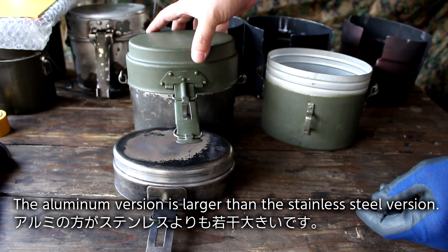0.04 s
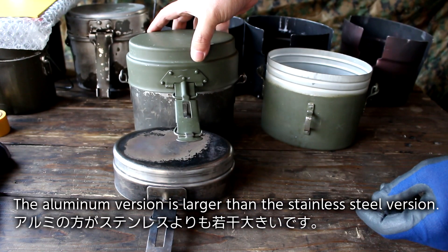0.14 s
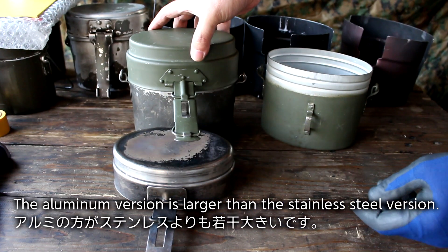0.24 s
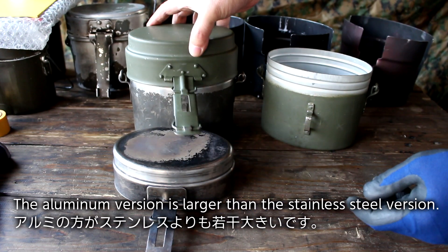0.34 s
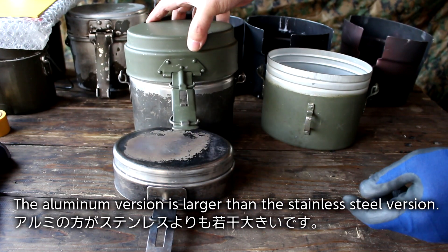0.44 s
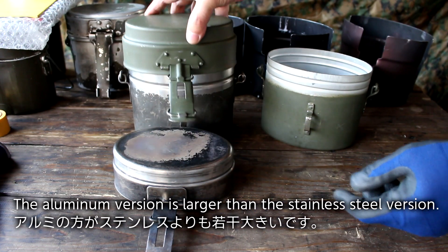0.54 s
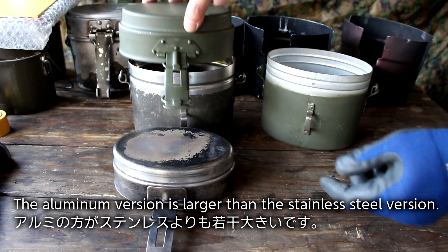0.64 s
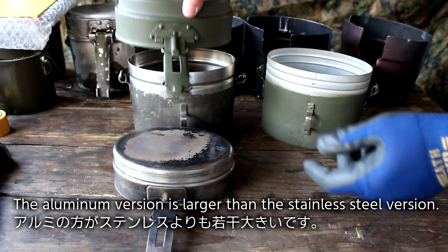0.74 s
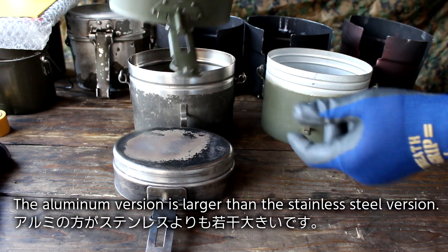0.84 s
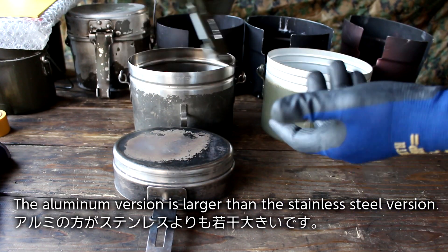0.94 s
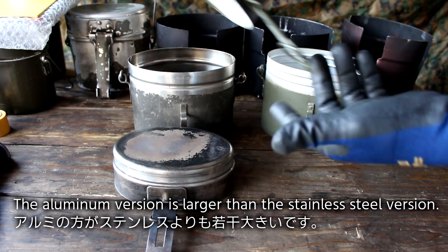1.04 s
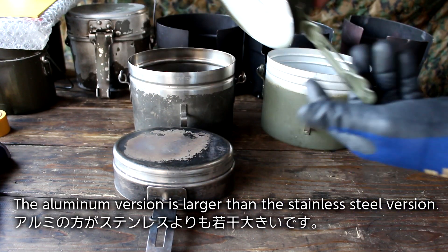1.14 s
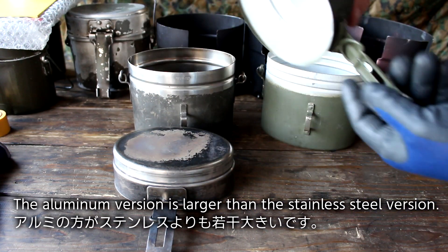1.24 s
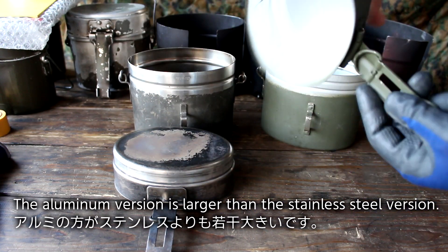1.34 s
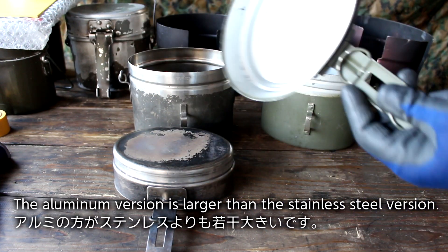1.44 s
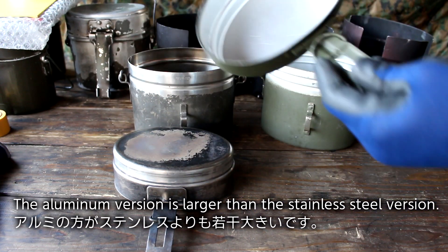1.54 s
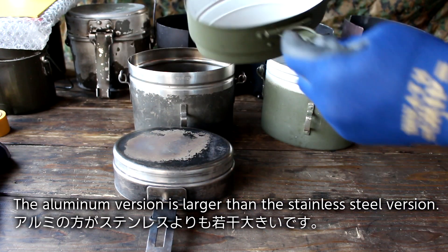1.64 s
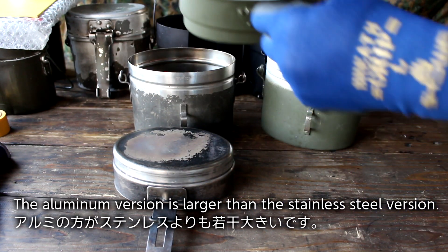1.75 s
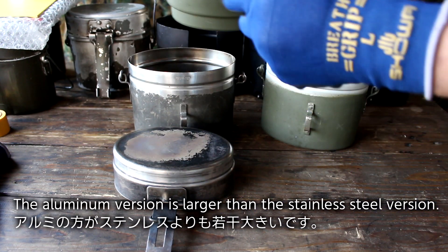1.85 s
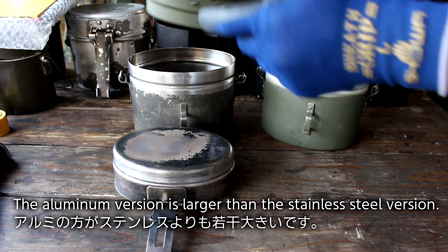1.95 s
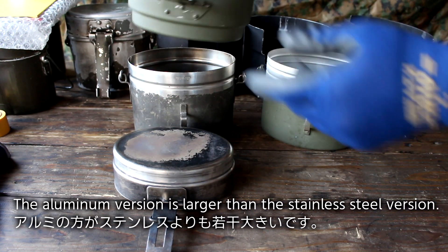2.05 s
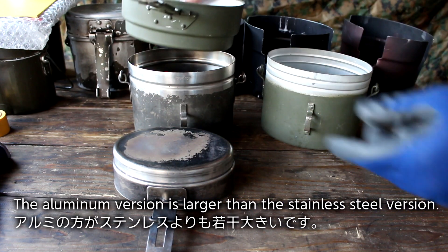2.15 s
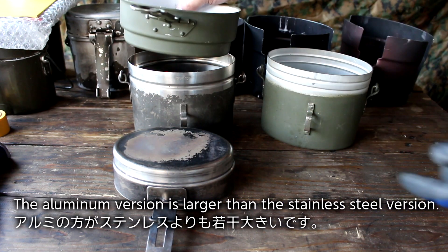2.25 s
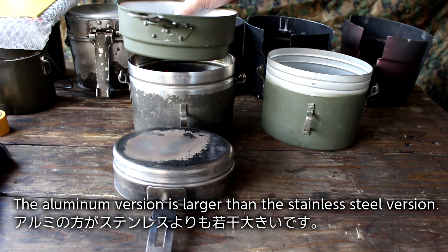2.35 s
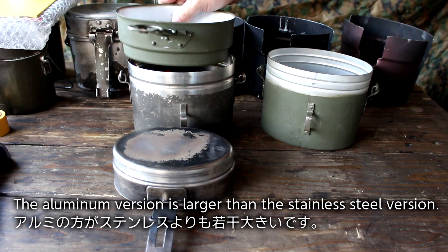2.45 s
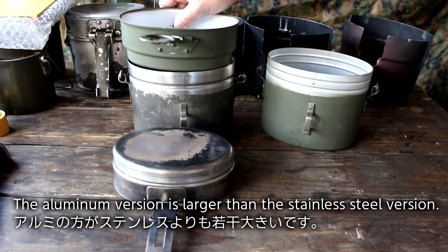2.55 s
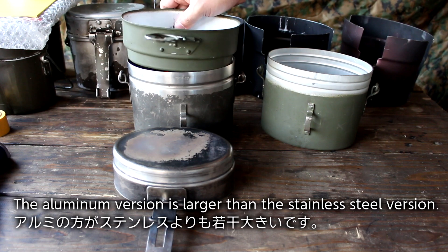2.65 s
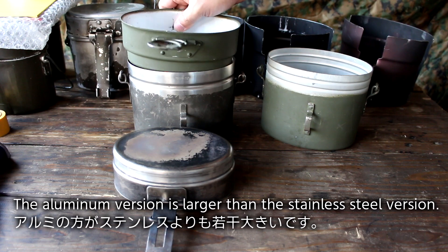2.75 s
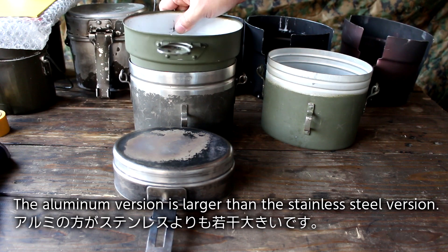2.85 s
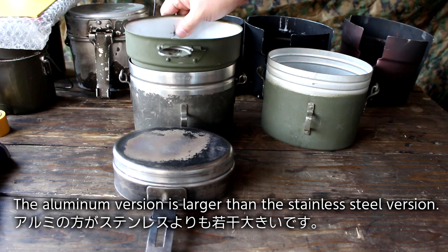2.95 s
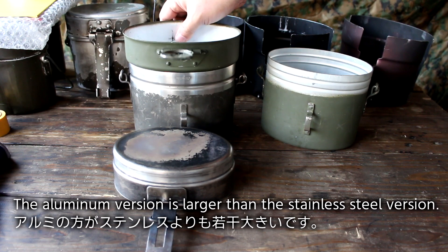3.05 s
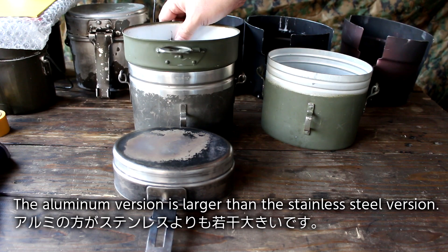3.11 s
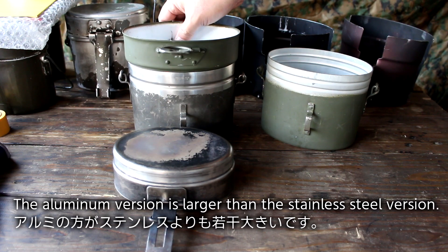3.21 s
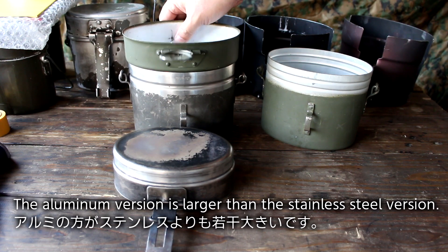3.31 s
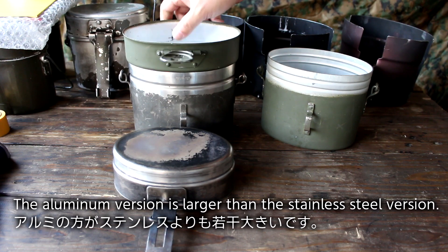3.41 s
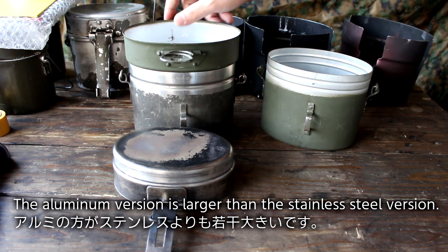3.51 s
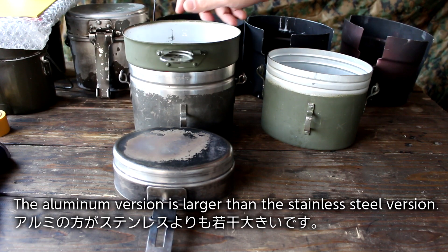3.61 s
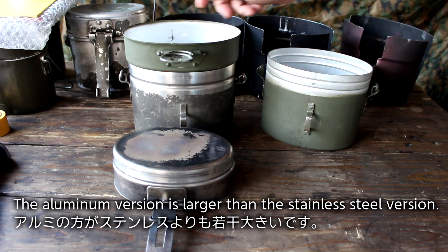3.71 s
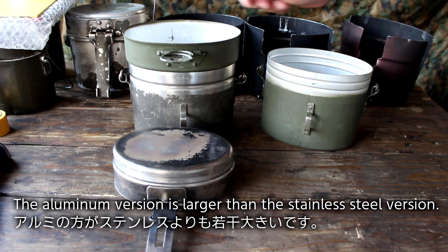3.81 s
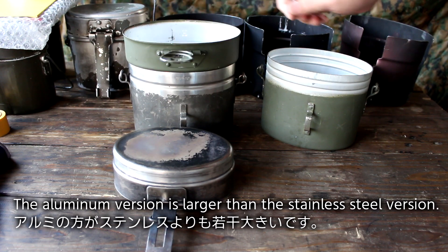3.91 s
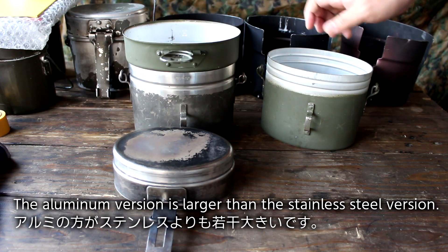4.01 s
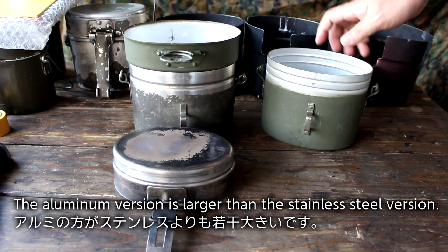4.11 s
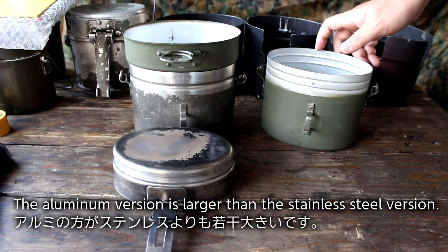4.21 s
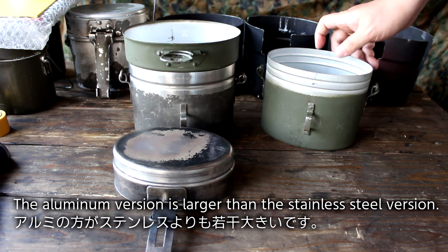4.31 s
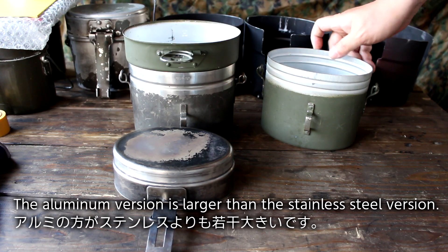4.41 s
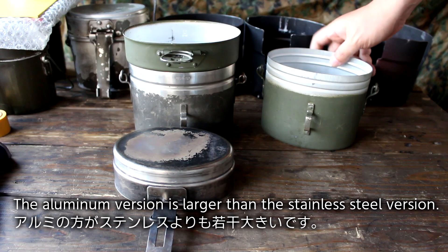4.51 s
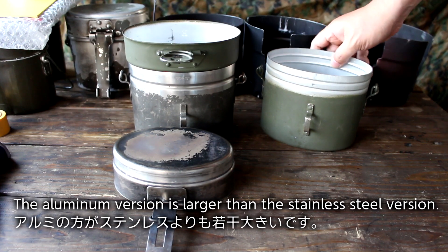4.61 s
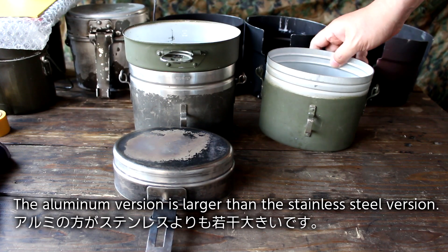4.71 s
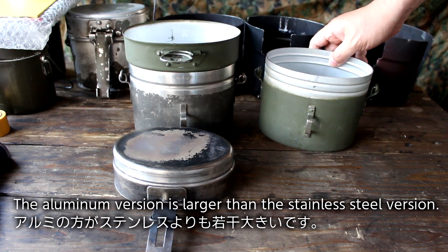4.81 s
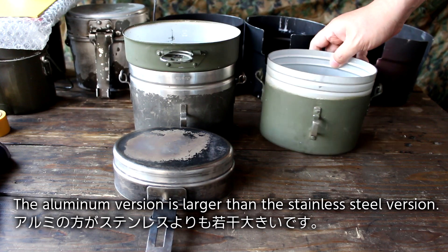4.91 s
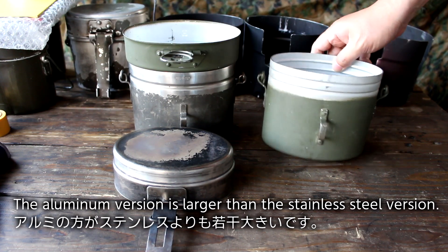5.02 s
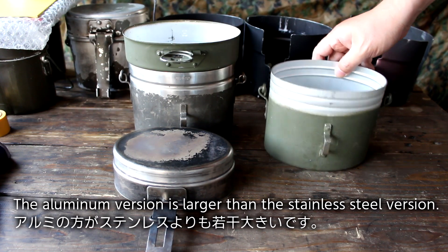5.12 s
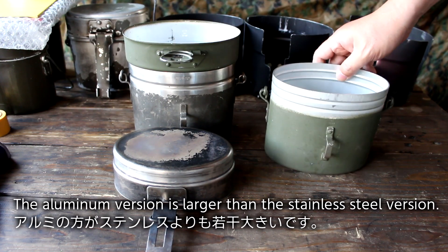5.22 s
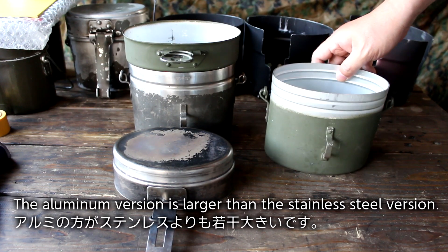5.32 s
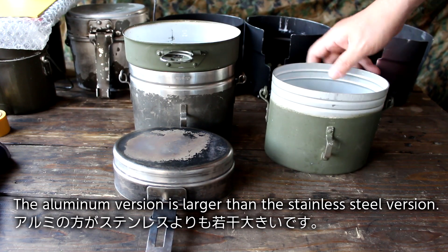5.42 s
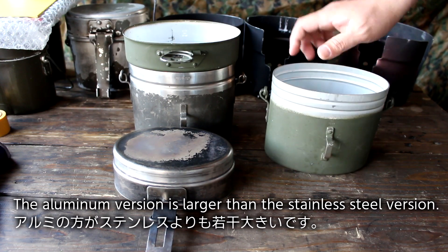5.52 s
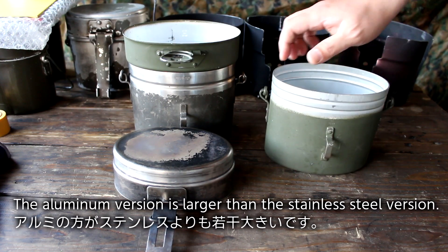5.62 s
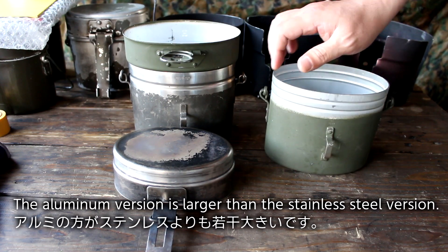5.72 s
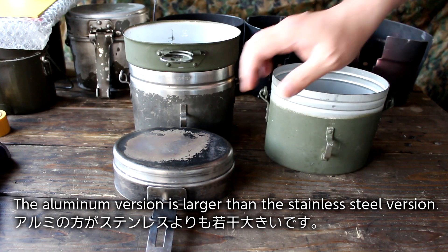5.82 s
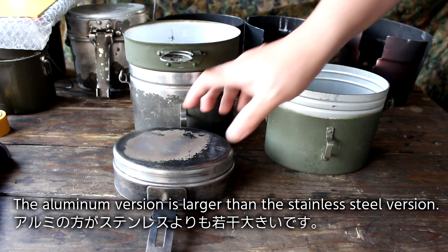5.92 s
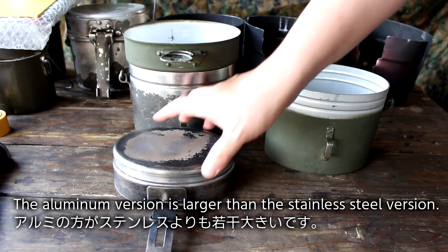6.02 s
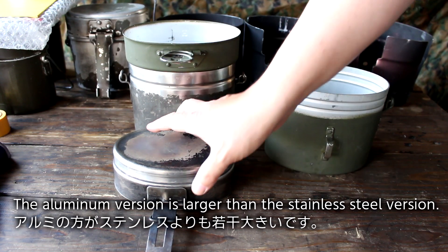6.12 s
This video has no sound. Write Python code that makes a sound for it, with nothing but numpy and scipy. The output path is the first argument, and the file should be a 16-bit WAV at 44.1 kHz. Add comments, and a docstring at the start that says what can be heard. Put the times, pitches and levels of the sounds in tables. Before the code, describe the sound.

In a quiet room, close and nearly mono, a tight lid rubs off a steel pot, which rings with a clank. The lid's folding handle clacks sharply, small wire tinkles follow, then light taps. The lid knocks and scrapes onto the rim with hollow, sinking notes. After a pause, an aluminium pot rattles its wire bail and thuds onto a wooden table.

```python
"""A quiet room: mess tins handled on a wooden table, close to a nearly mono microphone.
First a tight lid is rubbed off a steel pot, whose struck modes ring on; its folding handle clacks.
The lid is turned over, tapped by the handle, and shuffled onto the rim, pumping hollow notes from the gap.
Last an aluminium pot is lifted and set down with a thud while its wire bail rattles.
Knocks are decaying modes fed by chatter, strokes are filtered grains, and steady noise lies beneath."""
import sys
import numpy as np
from scipy import signal
from scipy.fft import rfft, irfft, next_fast_len
from scipy.io import wavfile
from scipy.ndimage import map_coordinates

SR = 44100
rng = np.random.default_rng(int(sys.argv[2]) if len(sys.argv) > 2 else 0)


def dump(signal):
    """Clip the signal to [-1, 1] and save it as 16-bit WAV at the path in sys.argv[1]."""
    limited = np.clip(np.atleast_2d(signal).T, -1, 1)
    pcm = np.round(limited * 32767).astype(np.int16)
    wavfile.write(sys.argv[1], SR, pcm)


N = 271656  # length in samples

# The room's steady hush: f/Hz, relative density/dB per Hz
AIR = [(12, -27), (20, -2), (86, -1), (138, -11.5), (187, -3.5), (228, -7.5), (319, -15.5), (357, -8),
       (422, -11), (499, -12), (759, -10.5), (1120, -6.5), (1610, -17), (14700, -23.5), (16000, -26)]
AIR_DB = -61.5
# Stereo width of the hush: f/Hz, side over mid level/dB
WIDTH = [(60, -15), (150, -16.5), (380, -9.5), (950, -20), (2380, -6.5), (5980, -3), (15000, 0)]
# Reverberation of the room: f/Hz, t60/s
ROOM = [(200, 0.58), (1000, 0.3), (4000, 0.2), (12000, 0.028)]
# Treble ripple of the microphone: f/Hz, level/dB
MIC = [(8000, -2.5), (8900, 1.5), (9700, -5), (10500, 3), (11500, -6), (12500, 1), (14500, 1)]
TOP_HZ = 16100

# The pot hums while the lid hovers over its mouth: middle t/s, half-length/s, level/dB
HOVERS = [(2.262, 0.1, -68.5), (2.853, 0.29, -61)]
MOUTH_HZ = 209.6
# The lid pumps the air in the gap beneath it; the narrower the gap, the lower the note:
# t/s, starting f/Hz, level/dB, rise/s
PUFFS = [(2.636, 388.4, -33, 0.0014), (2.894, 366, -41.5, .005), (3.04, 303, -34, 0.028),
         (3.2, 214, -44, 0.0022), (3.436, 247, -43, 0.0036)]
PUFF_T60 = 0.25  # s
PUFF_SAG, SAG_S = 0.11, 0.048  # share of its pitch a note loses as the lid settles; time constant/s

# Fingers shift on a tin that is held: middle t/s, half-length/s, level/dB, tilt/dB per band
GRIPS = [(1.75, .4, -63.5, 2.5), (2.7, 1, -67.5, -2.5), (5.792, .3, -65.5, 2.5)]
# Metal slides on metal or wood as the lid is worked loose, turned over and shuffled into place,
# then as the pot is picked up and set down: middle t/s, half-length/s, level/dB, tilt/dB per band
STROKES = [(0.345, 0.049, -66, -11), (0.417, 0.027, -50.5, 5), (0.463, 0.057, -44.5, 0),
           (0.55, 0.025, -53.5, 2), (0.601, 0.039, -48, 3.5), (1.465, 0.052, -61, 9),
           (1.934, .014, -56.5, 0), (1.974, 0.011, -53, -1.5), (2.839, .04, -49, -3.5),
           (3.003, 0.094, -48, -0.5), (3.103, 0.05, -43, 0.5), (3.43, 0.025, -43.5, -3),
           (4.348, 0.034, -61.5, -5), (4.646, 0.041, -61, -7), (4.739, 0.011, -48, -0.5),
           (4.863, 0.035, -60, -2), (5.12, 0.017, -52.5, -2.5), (5.38, 0.072, -60.5, -2),
           (5.615, 0.077, -61, -3)]
SHUDDER_DB, HISS_DB = -4, -3.5  # bass and treble of a stroke against its middle, before tilt
# Colour of the friction: f/Hz, relative density/dB per Hz
FRICTION = [(65, -51), (110, -5), (278, -4), (314, -2.5), (525, -41), (1040, 6), (1270, -28.5), (1700, -11),
            (2130, -31), (2510, -14.5), (3140, -18.5), (3700, -11), (4280, -16.5), (4940, -7), (15000, -28)]

# A small wire loop tinkles: t/s, level/dB, f/Hz
TINKLES = [(1.168, -50, 4670), (1.478, -48, 4870), (1.571, -43.5, 4790), (1.583, -52, 4640),
           (1.85, -53, 4650), (4.335, -54.5, 4690), (4.373, -54, 4690), (4.533, -49, 4510)]

# Contacts: t/s, ring level/dB, tilt/dB towards the treble, rise/s, thump level/dB.
# The lid slips off the steel pot
STEEL_HITS = [(0.6325, -33, 1.5, 0.00092, -42), (0.651, -38.5, -3.5, 0.0033, -39),
              (0.662, -44, -0.5, 0.0033, -42), (0.69, -50, -2.5, 0.0042, -54)]
# The folding handle swings against its lid (too light for a thump: no last column)
HANDLE_HITS = [(1.167, -60.5, -1, 0.0042), (1.2485, -46, 12.5, 0.00094), (1.251, -43, -8, 0.0022),
               (1.2655, -45, 0, .002), (1.315, -53, -2.5, .002), (1.3572, -47.5, 2, 0.00039),
               (1.3603, -28, 5, 0.0014)]
# The folded handle taps the lid's back (no thump column)
TAP_HITS = [(1.9795, -36, -0.5, 0.0058), (2.0545, -45.5, -5.5, 0.0097), (2.4205, -46.5, -2.5, 0.0061)]
# The aluminium lid knocks about on the rim
LID_HITS = [(2.6355, -33.5, -11.5, 0.00096, -41), (2.675, -37.5, -13.5, 0.0023, -37.5),
            (2.77, -63, -13.5, .001, -66), (2.873, -54.5, -23, .006, -42),
            (2.893, -33.5, -10.5, 0.0089, -36), (2.908, -41.5, -6.5, .0027, -57),
            (3.154, -49.5, -10, 0.004, -45.5), (3.198, -37.5, -11, 0.0011, -42.5),
            (3.217, -33.5, 0, 0.0015, -62), (3.405, -64, -12, 0.0022, -57),
            (3.435, -36, -9, 0.00084, -37.5), (3.448, -32, -2, 0.007, -41), (3.479, -34, -1, 0.0085, -45)]
# The wire bail and catch rattle against the aluminium pot's wall
BAIL_HITS = [(4.534, -59.5, 2.5, 0.012, -68), (4.57, -57, -0.5, .005, -54.5),
             (4.699, -50.5, 3, 0.0031, -55), (4.761, -43.5, 7, 0.00095, -62), (4.771, -39, 4, 0.0014, -44),
             (4.8765, -36, 0.5, 0.001, -44.5), (4.938, -49.5, 0, 0.0051, -51), (4.996, -45, 7, 0.0092, -45),
             (5.014, -43.5, -2.5, 0.0043, -68), (5.033, -49.5, 1, .004, -49), (5.1318, -37, 3, 0.0011, -47),
             (5.143, -44, .5, 0.0012, -50.5), (5.238, -39, 6, 0.00068, -38), (5.262, -39, 5, 0.0043, -56),
             (5.2875, -43, 0, 0.0016, -61), (5.302, -40, 8.5, 0.001, -42.5), (5.326, -57, 2, .0026, -75),
             (5.501, -55, -4, 0.0013, -55)]
# The pot's edge skids over the table top
SKID_HITS = [(4.786, -47, -5, 0.0043, -44), (4.825, -61, -3, .008, -66), (4.915, -50, -1, 0.0048, -55)]
# The aluminium pot's bottom meets the table
BASE_HITS = [(4.7485, -51, -4.5, 0.00062, -35), (4.9865, -48.5, -7, 0.00046, -43),
             (5.2265, -33, -13, 0.00067, -25), (5.2455, -43.5, -18.5, 0.001, -41),
             (5.28, -43.5, -6, 0.0021, -37.5), (5.574, -72, 1, 0.0022, -48.5)]

# Modes of each object: f/Hz, relative level/dB, t60/s
STEEL_MODES = [(288.4, 14, 0.077), (786, 11.5, 0.11), (944, 8.5, 0.095), (1090, 2.5, 0.26),
               (1376, -7.5, 0.17), (1657, -10, 0.25), (1717, -4, 0.27), (2433, -10, 0.17),
               (2672, -14, 0.33), (3510, -13, 0.27), (4550, -6, 0.19), (2253, -14, 0.2), (2860, -21, 0.13),
               (4690, 6.5, 0.076), (5280, -9, 0.2), (6100, -9.5, .1), (5300, -13, 0.27)]
HANDLE_MODES = [(836, -11, 0.066), (1025, -9, .07), (1093, -13, 0.18), (1384, -41, 0.48),
                (1633, -20.5, 0.12), (1730, -13.5, 0.055), (2582, 4, .07), (2690, 5, .035),
                (2904, -4.5, 0.032), (3754, -2.5, 0.028), (4102, -33, 0.078), (5200, -6.5, 0.04),
                (5500, 7.5, 0.013), (5980, -2, 0.031), (6630, 0, 0.022), (8460, -13.5, .03),
                (9480, -3.5, 0.021), (10900, -5, 0.0079), (11980, -10.5, 0.02)]
TAP_MODES = [(848, -11.5, 0.092), (1009, 6, 0.029), (1067, 0.5, 0.075), (1665, -28, 0.077),
             (2400, -12.5, 0.13), (3900, -17, 0.033), (4680, 5, 0.028), (5440, -23, 0.03), (6700, 5, 0.02),
             (8850, -9, 0.016)]
LID_MODES = [(158, -22.5, 0.051), (382, -11.5, 0.035), (645, -12.5, 0.016), (861, -1, 0.11),
             (943, -1, 0.083), (1033.5, 4, 0.08), (1108, -0.5, 0.088), (1401, -19.5, 0.13),
             (1700, -9.5, 0.083), (2450, -4, 0.17), (2610, -9, 0.14), (2814, 0, 0.092), (3643, -11, 0.06),
             (4150, -6, 0.07), (4620, -3.5, 0.11), (4940, -2, 0.096), (6200, -0.5, 0.066),
             (6436, 0.5, 0.077), (7120, -1.5, 0.065), (8430, -5, 0.059)]
RIM_MODES = [(3800, -6, 0.039), (4900, -7, 0.078), (5140, 10, 0.051), (5400, -5, 0.031), (6240, -4.5, .012)]
BAIL_MODES = [(303, -29, 0.087), (674, -22, 0.2), (845, 0.5, 0.16), (1040, -25, 0.06), (1392, -12.5, 0.11),
              (1977, -10, 0.21), (2235, -24, 0.31), (2410, -21, 0.13), (2620, -8.5, 0.14),
              (2850, -16.5, 0.24), (2870, -20, 0.33), (3266, -12, 0.15), (3700, -3, 0.074),
              (4310, -8.5, 0.15), (4820, -11, 0.13), (5410, 11, 0.033), (5840, -1.5, 0.041),
              (6540, -5, 0.06), (6650, -5, 0.054), (8670, 5, 0.017)]
BASE_MODES = [(147, -8.5, 0.078), (203, -3.5, 0.11), (282, -3.5, 0.096), (477, -2, 0.13), (696, 8, 0.085),
              (863, -7, .06), (1020, -2, 0.046), (1760, -18.5, 0.16), (2340, 1, 0.019)]
# The crowd of weaker modes in thin metal: f/Hz, relative density/dB per Hz
LID_WASH = [(120, -19), (230, -9), (550, -14.5), (800, -6.5), (1110, -7.5), (1240, -52), (2050, -7),
            (2450, 9), (2900, 4.5), (3280, -18.5), (3900, 2), (6800, 3), (9000, -0.5), (15000, -23.5)]
POT_WASH = [(120, -14), (250, 7), (600, 4), (1070, 6.5), (1250, -10), (2500, -6), (3600, -4.5), (5400, 5.5),
            (7500, 0.5), (9000, -5.5), (11500, -12), (15000, -29.5)]
# Thump, body, clank and sparkle: from f/Hz, to f/Hz
BANDS = [(110, 600), (600, 1400), (1400, 3800), (3800, 15000)]
CLANK_TO_TOP = (BANDS[2][0], BANDS[3][1])
CHATTER_GROWS = 0.44  # a brighter, more glancing contact chatters longer: dB of duration per dB of tilt


def amp(db):
    """Decibels to gain."""
    return 10 ** (np.asarray(db) / 20)


def unit(x):
    """Scaled to rms 1."""
    return x / np.sqrt(np.mean(x ** 2) + 1e-20)


def fade(t, t60):
    """A decay that loses 60 dB in t60."""
    return np.exp(-np.log(1000) * t / t60)


def along(points, hz):
    """(f/Hz, value) points read on a log frequency axis."""
    f, v = np.transpose(points)
    return np.interp(np.log(hz + 1), np.log(f + 1), v)


def filtered(x, response):
    """x times a response of frequency."""
    n = x.shape[-1]
    padded = next_fast_len(n + SR // 10)
    spectrum = rfft(x, padded) * response(np.fft.rfftfreq(padded, 1 / SR))
    return irfft(spectrum, padded)[..., :n]


def coloured(x, spectrum):
    """x shaped by the given spectrum, at rms 1."""
    return unit(filtered(x, lambda hz: amp(along(spectrum, hz))))


def band(x, edges):
    """One band of x, causally."""
    return signal.sosfilt(signal.butter(4, edges, 'band', fs=SR, output='sos'), x)


def wobble(rate):
    """A smooth random curve, rate knots a second."""
    knots = rng.standard_normal(int(N * rate / SR) + 4)
    return map_coordinates(knots, [np.arange(N) * rate / SR])


def swell(s, half_length):
    """A smooth rise and fall around time s."""
    return np.exp(-((np.arange(N) / SR - s) / half_length) ** 2)


def ping(s, db, hz, t60, rise):
    """One mode ringing on by itself from time s."""
    t = np.maximum(np.arange(N) / SR - s, 0)
    return amp(db) * np.sin(2 * np.pi * hz * t) * fade(t, t60) * (1 - np.exp(-t / rise))


def hush():
    """Steady room noise: nearly mono in the bass, separate hiss at the top."""
    mid, side = filtered(rng.standard_normal((2, N)), lambda hz: amp(along(AIR, hz)))
    side = filtered(side, lambda hz: amp(along(WIDTH, hz)))
    level = amp(AIR_DB + 0.13 * wobble(2.21))
    return level * unit(np.array([mid + side, mid - side]))


def room(x, wet_db, side_db):
    """A short, weak tail of decaying noise behind the close sound, almost the same in both channels."""
    hz, t, z = signal.stft(rng.standard_normal((2, SR // 2)), SR, nperseg=256)
    tail = signal.istft(z * fade(t, along(ROOM, hz)[:, None]), SR, nperseg=256)[1]
    delay = int(0.006 * SR)
    tail = np.pad(tail / np.linalg.norm(tail[0]), ((0, 0), (delay, 0)))
    mid, side = amp(wet_db) * signal.fftconvolve(x[None], tail, axes=1)[:, :N]
    side = amp(side_db) * side
    return np.array([x + mid + side, x + mid - side])


def mouth_hum(stir_rate):
    """The pot's narrow air resonance, stirred at random by stir_rate knots a second."""
    stir = wobble(stir_rate) + 1j * wobble(stir_rate)
    note = np.real(stir * np.exp(2j * np.pi * MOUTH_HZ * np.arange(N) / SR))
    return unit(note) * sum(amp(db) * swell(s, half) for s, half, db in HOVERS)


def gap_air():
    """Each push of the lid sounds a hollow note that sinks as the gap closes."""
    out, t = np.zeros(N + SR), np.arange(SR // 2) / SR
    for s, hz, db, rise in PUFFS:
        pitch = hz * (1 - PUFF_SAG * (1 - np.exp(-t / SAG_S)))
        note = np.sin(2 * np.pi * np.cumsum(pitch) / SR)
        envelope = fade(t, PUFF_T60) * (1 - np.exp(-t / rise))
        out[round(s * SR):][:len(t)] += amp(db) * note * envelope
    return out[:N]


def stirred(grains, modes):
    """Modes set ringing by friction grains, at rms 1."""
    t = np.arange(SR // 4) / SR
    ring = sum(amp(db) * np.sin(2 * np.pi * hz * t) * fade(t, t60) for hz, db, t60 in modes)
    return unit(signal.fftconvolve(grains, ring)[:N])


def rubbing(grain_db, ring_db, rim_db):
    """Sticking and slipping: uneven grains that also stir the modes of lid and rim."""
    unevenness_db = 1.45 * wobble(1500) + grain_db * wobble(350) + 2.77 * wobble(60)
    grains = rng.standard_normal(N) * rng.exponential(size=N) * amp(unevenness_db)
    scrape = coloured(grains, FRICTION)
    scrape = scrape + amp(ring_db) * stirred(grains, LID_MODES)
    scrape = scrape + amp(rim_db) * stirred(grains, RIM_MODES)
    spans = [BANDS[0], BANDS[1], CLANK_TO_TOP]
    # every stroke swells and dies away; a keener edge tilts it towards the treble
    power = np.zeros((len(spans), N))
    for s, half, db, tilt in STROKES + GRIPS:
        levels = [db + SHUDDER_DB - tilt, db, db + HISS_DB + tilt]
        power += np.outer(amp(levels), swell(s, half)) ** 2
    return sum(np.sqrt(p) * unit(band(scrape, edges)) for edges, p in zip(spans, power))


def twinned(modes, split):
    """An oval tin splits every mode in two: a weaker twin lies close beside it."""
    hz, db, t60 = np.transpose(modes)
    offset = split * rng.uniform(0.583, 2, len(hz)) * rng.choice([-1, 1], len(hz))
    twin_hz = hz * (1 + offset)
    return np.r_[hz, twin_hz], np.r_[db, db - 6], np.r_[t60, t60]


def struck(hits, modes, wash, wash_db, wash_t60, chatter, chatter_t60, clank_db, crack_db, split,
           detune=0.0014):
    """An object rung by each contact: a blow, then the edges buzz against each other."""
    hz, db, t60 = twinned(modes, split)
    t = np.arange(int(SR * max(t60.max(), 0.25))) / SR
    decays = fade(t, t60[:, None])
    out = np.zeros(N + len(t))
    first, touch = int(0.012 * SR), SR // 10  # samples that set the level; longest buzz
    for s, ring_db, tilt_db, rise, *thump_db in hits:
        # every point of contact favours other modes and loads them a little
        strength, load, phase = rng.standard_normal((3, len(hz), 1))
        sizes = amp(db[:, None] + 1.5 * strength)
        loaded_hz = hz[:, None] * (1 + detune * load)
        ring = np.sum(sizes * decays * np.sin(2 * np.pi * (loaded_hz * t + phase)), axis=0)
        # tiny rebounds of uneven size keep feeding the high modes
        rebounds = fade(t, chatter_t60 * amp(CHATTER_GROWS * tilt_db))
        buzz = rng.standard_normal(touch) * rng.exponential(size=touch) * rebounds[:touch]
        buzz = band(buzz, CLANK_TO_TOP)
        ring = ring + chatter * signal.fftconvolve(ring, buzz / np.linalg.norm(buzz))[:len(t)]
        crowd = coloured(rng.standard_normal(len(t)), wash)
        ring = ring + crowd * (amp(wash_db) * fade(t, wash_t60) + amp(crack_db) * rebounds)
        # the vibration takes a moment to spread over the sheet
        ring = ring * np.sin(np.pi / 2 * np.minimum(t / rise, 1)) ** 2
        # the hardness of the contact sets how the blow is shared: sparkle, clank, body, any thump
        levels = [ring_db + tilt_db, ring_db + clank_db, ring_db - tilt_db, *thump_db]
        for edges, level in zip(BANDS[::-1], levels):
            part = band(ring, edges)
            out[round(s * SR):][:len(t)] += amp(level) * part / np.std(part[:first])
    return out[:N]


def wire_loop():
    """A small wire loop tinkles, one short high mode at a time."""
    return sum(ping(s, db, hz, t60=0.071, rise=0.0022) for s, db, hz in TINKLES)


def steel_pot():
    """Once free of its lid, the pot's rim sings on over a low hum of its wall."""
    knocks = struck(STEEL_HITS, STEEL_MODES, POT_WASH, wash_db=8.0, wash_t60=0.12, chatter=0.67,
                    chatter_t60=0.092, clank_db=1, crack_db=-6.5, split=0.046, detune=0.0015)
    freed = STEEL_HITS[0][0]
    rim = ping(freed, db=-46, hz=784, t60=4.7, rise=0.005)
    wall = ping(freed, db=-47.0, hz=247.4, t60=1.0, rise=0.013)
    return knocks + rim + wall


def folding_handle():
    """A light handle clacks against its lid, then taps the lid's back with quickly damped modes."""
    clacks = struck(HANDLE_HITS, HANDLE_MODES, LID_WASH, wash_db=-4, wash_t60=0.036, chatter=0.051,
                    chatter_t60=0.0084, clank_db=7.5, crack_db=-2.5, split=0.013, detune=0.0016)
    taps = struck(TAP_HITS, TAP_MODES, LID_WASH, wash_db=-9.0, wash_t60=0.064, chatter=0.26,
                  chatter_t60=0.019, clank_db=-3.5, crack_db=1.5, split=0.0198)
    return clacks + taps


def lid_on_rim():
    """The aluminium lid knocks about on the rim, its thin sheet ringing briefly."""
    return struck(LID_HITS, LID_MODES, LID_WASH, wash_db=3.5, wash_t60=0.1, chatter=0.53,
                  chatter_t60=0.075, clank_db=-3, crack_db=3.5, split=0.0194)


def aluminium_pot():
    """The bail rattles on the wall, the edge skids with the same modes, the bottom thuds on the table."""
    bail = struck(BAIL_HITS, BAIL_MODES, POT_WASH, wash_db=8.5, wash_t60=0.1, chatter=0.99,
                  chatter_t60=0.045, clank_db=-0.5, crack_db=1, split=0.0401)
    skids = struck(SKID_HITS, BAIL_MODES, POT_WASH, wash_db=8, wash_t60=0.088, chatter=0.9,
                   chatter_t60=0.14, clank_db=7.5, crack_db=4, split=0.039)
    base = struck(BASE_HITS, BASE_MODES, POT_WASH, wash_db=-7, wash_t60=0.22, chatter=0.68,
                  chatter_t60=0.03, clank_db=0, crack_db=0, split=0.012)
    return bail + skids + base


def scene():
    """The tins, their scraping and their hollow air, close up in a quiet room."""
    tins = wire_loop() + steel_pot() + folding_handle() + lid_on_rim() + aluminium_pot()
    scraping = rubbing(grain_db=2.0, ring_db=-2, rim_db=-9)
    metal = filtered(tins + scraping, lambda hz: amp(along(MIC, hz)))
    hollow = mouth_hum(stir_rate=10.0) + gap_air()
    return room(metal + hollow, wet_db=-20.5, side_db=-62) + hush()


def record(dry):
    """Nothing is kept above the band limit."""
    return filtered(dry, lambda hz: hz < TOP_HZ)


dry = scene()
out = record(dry)
dump(out)
```